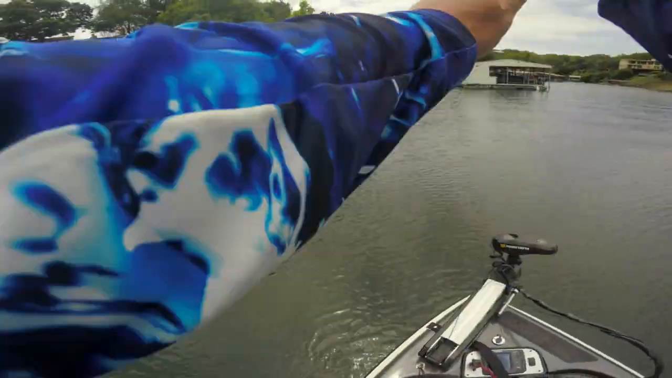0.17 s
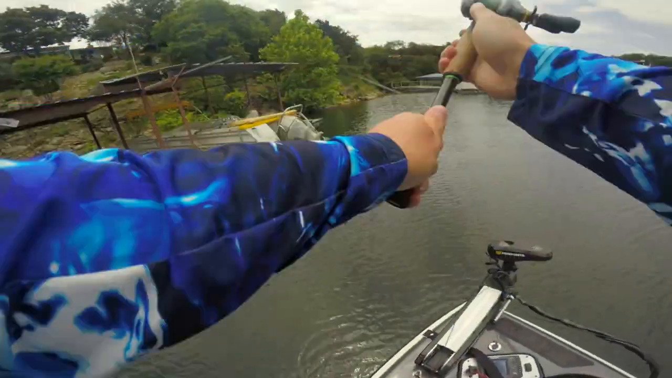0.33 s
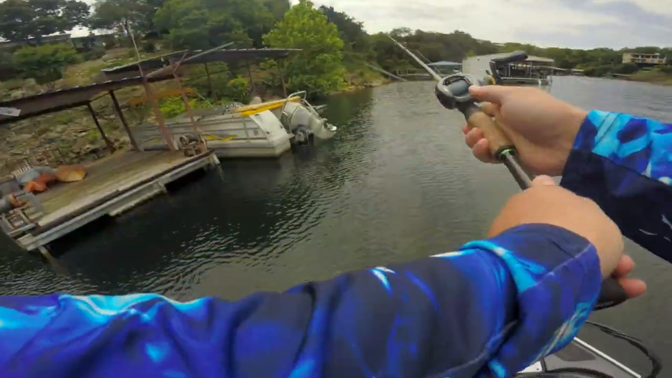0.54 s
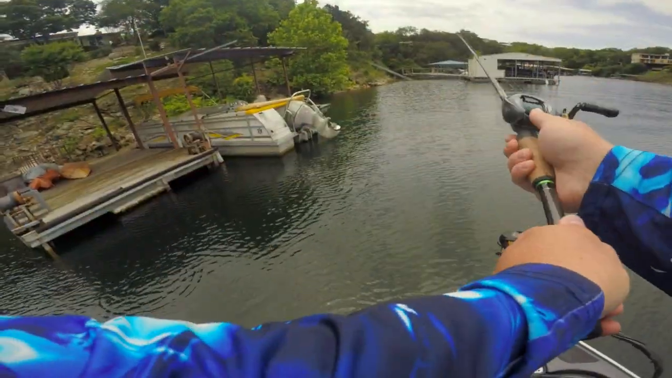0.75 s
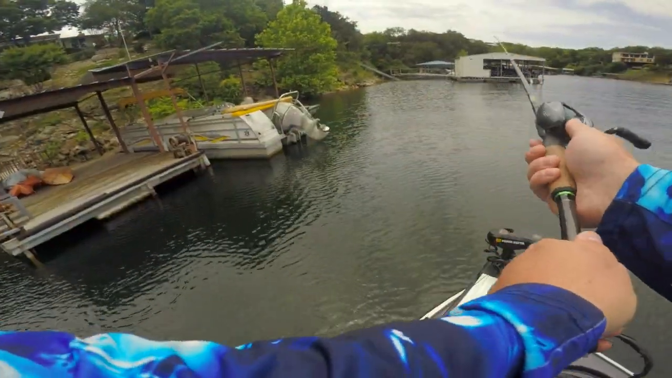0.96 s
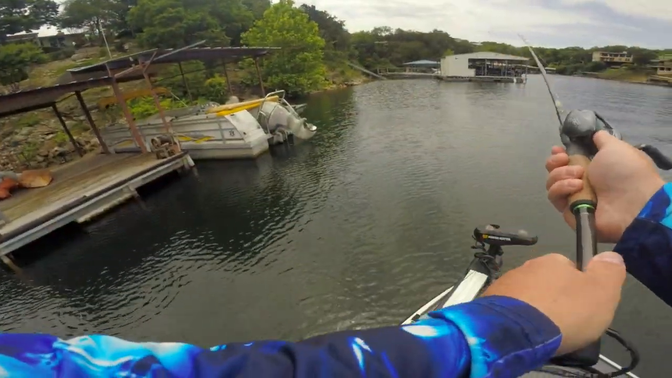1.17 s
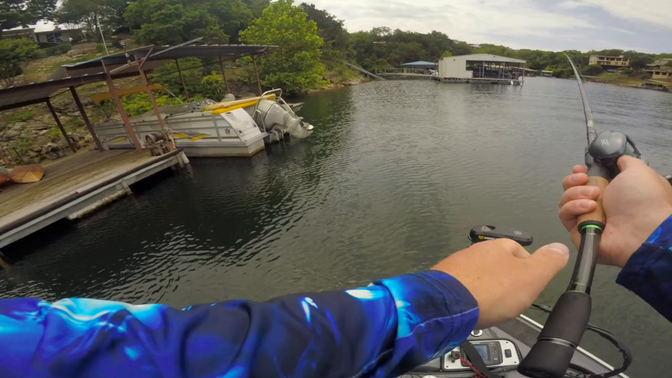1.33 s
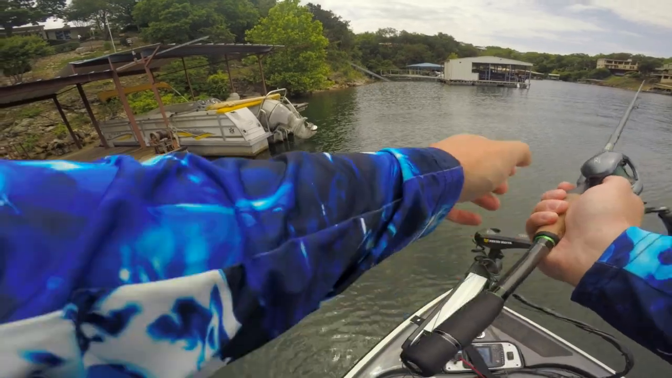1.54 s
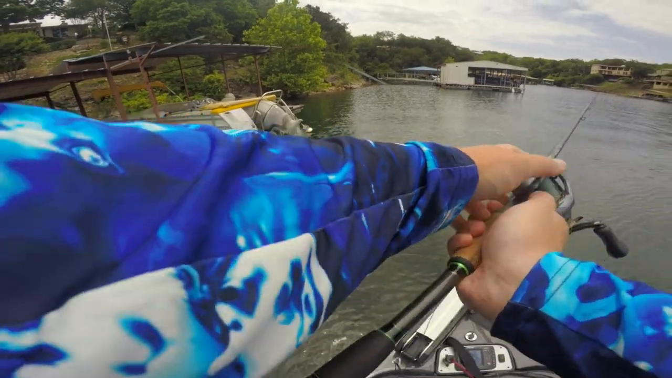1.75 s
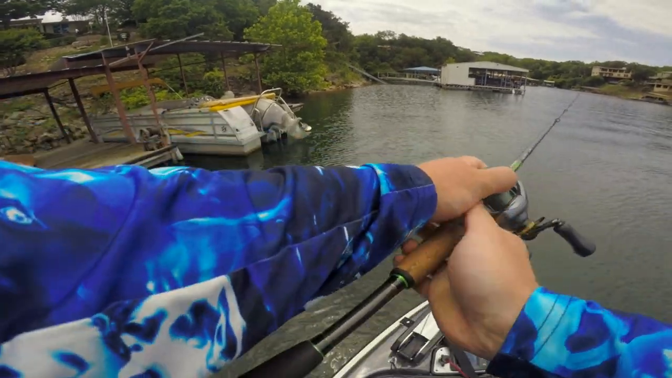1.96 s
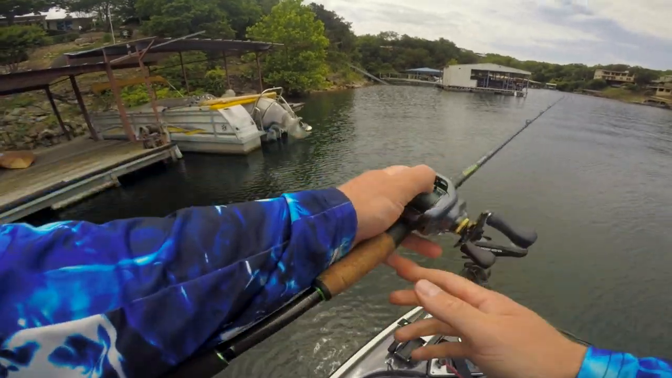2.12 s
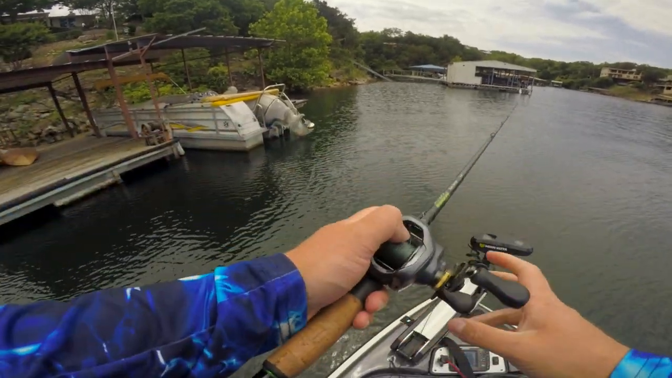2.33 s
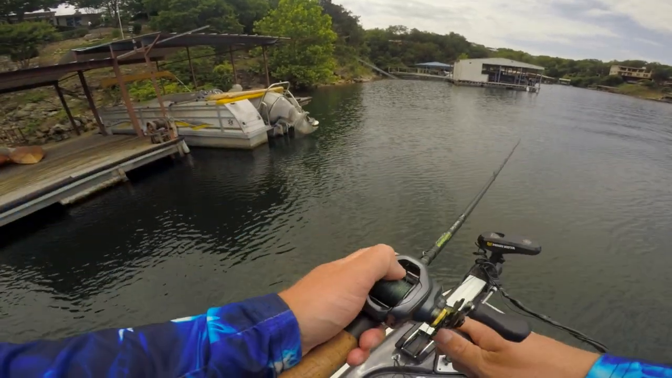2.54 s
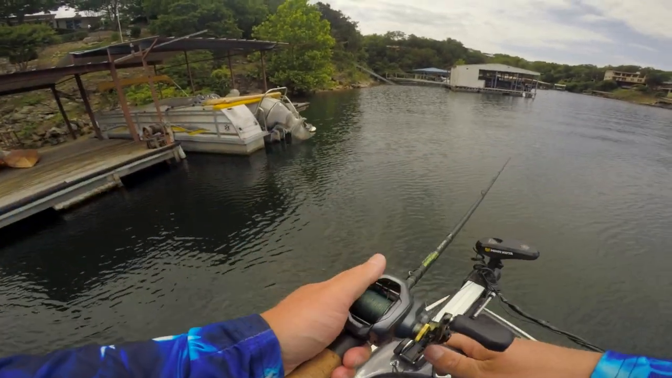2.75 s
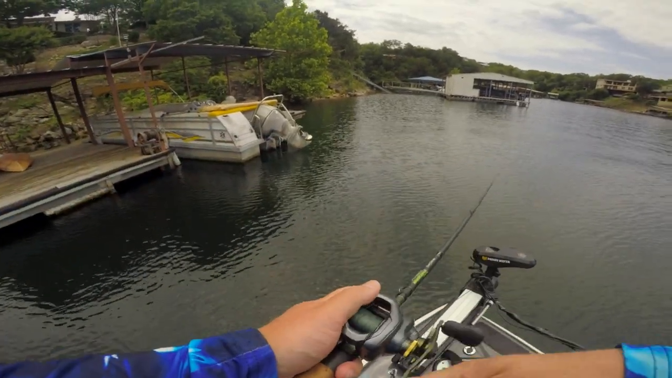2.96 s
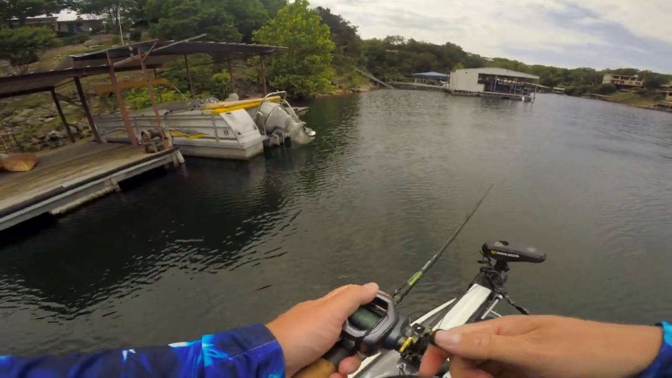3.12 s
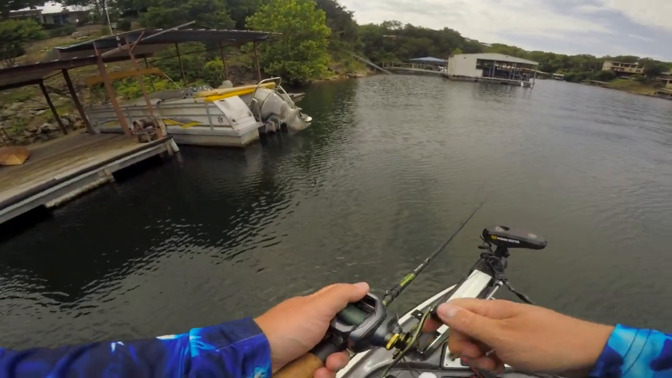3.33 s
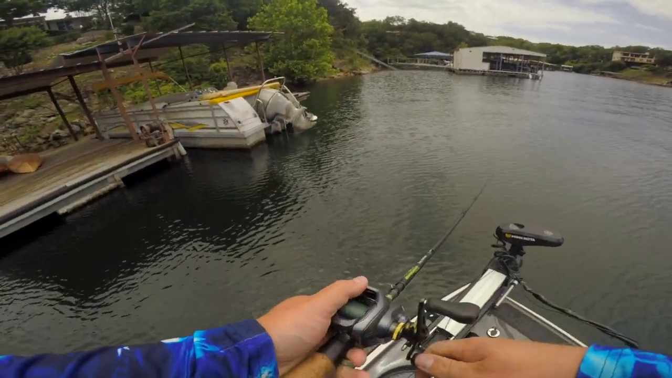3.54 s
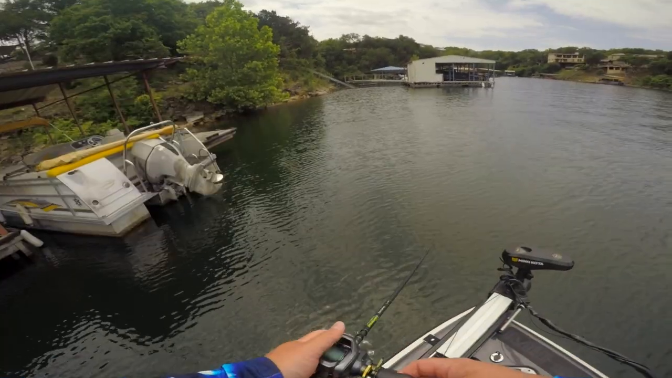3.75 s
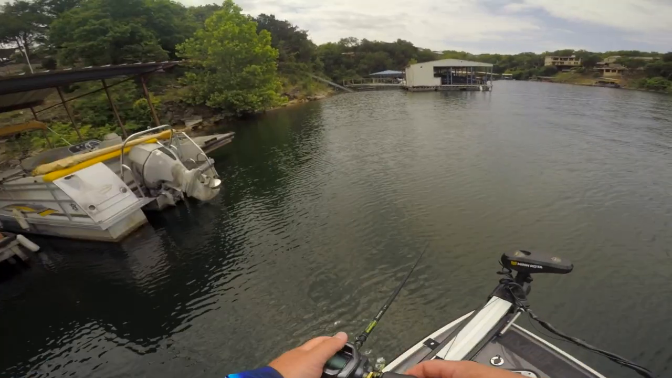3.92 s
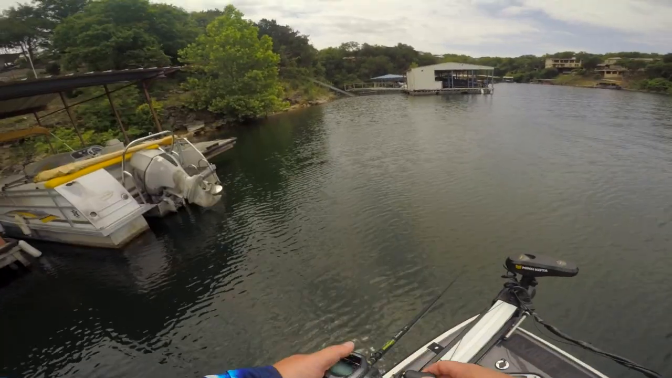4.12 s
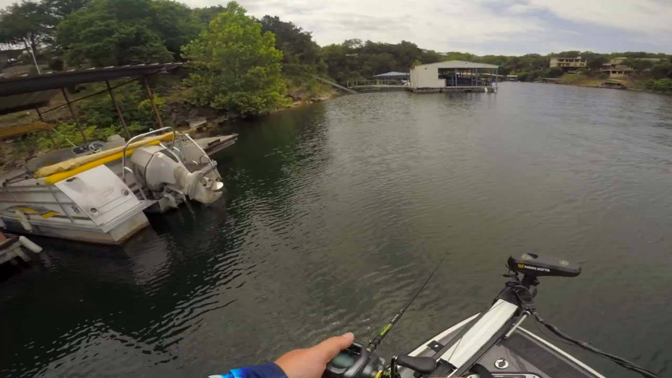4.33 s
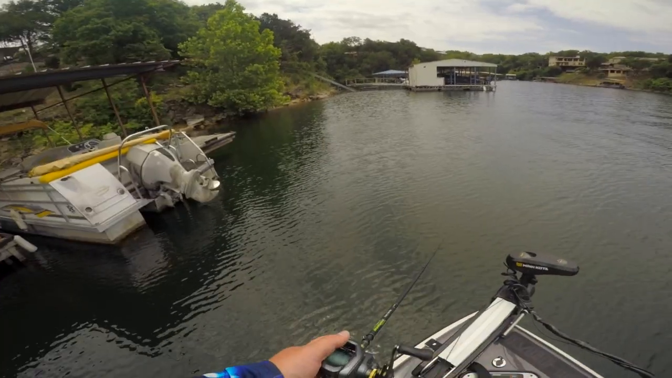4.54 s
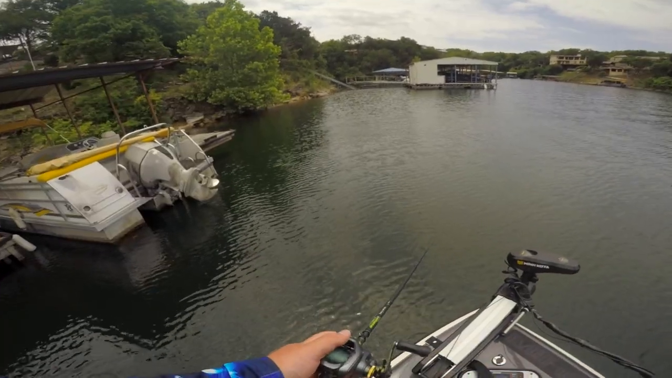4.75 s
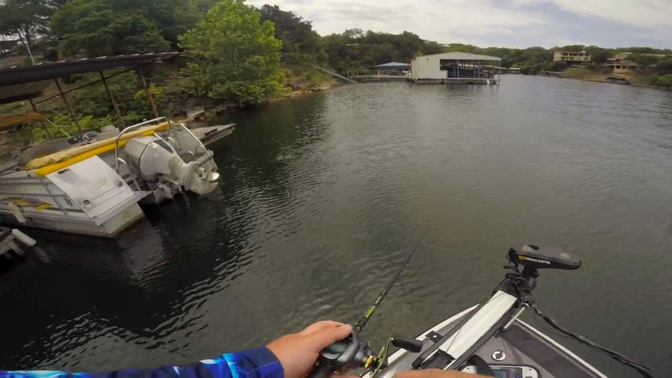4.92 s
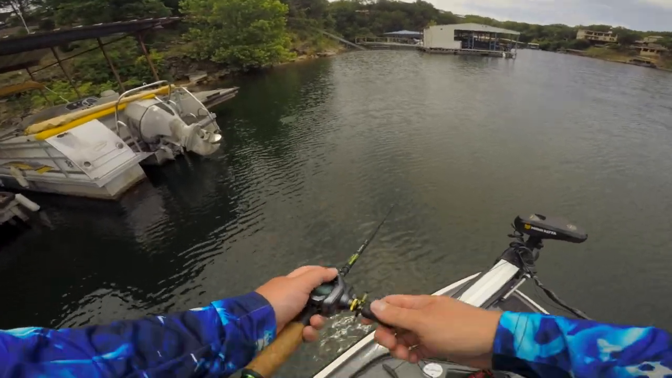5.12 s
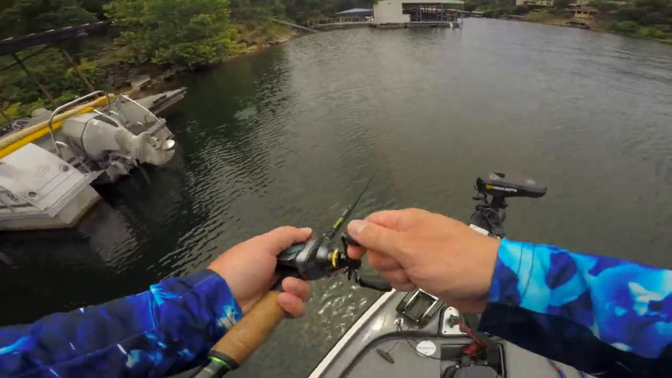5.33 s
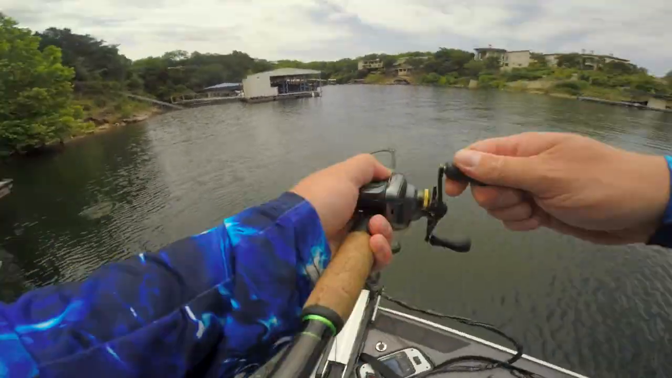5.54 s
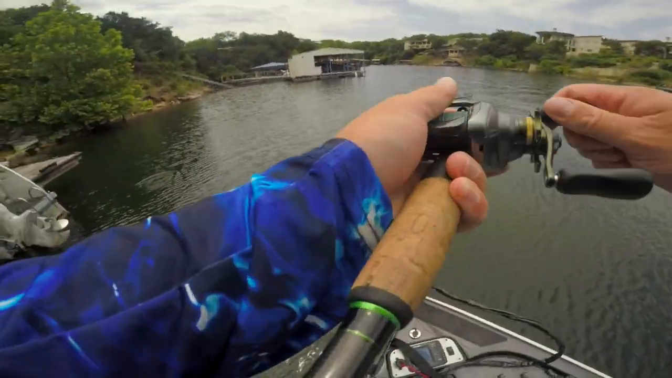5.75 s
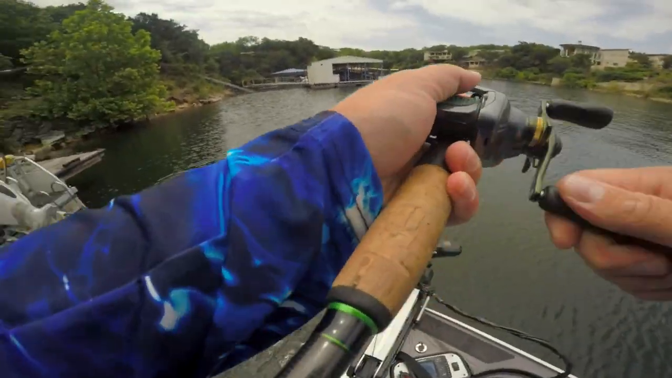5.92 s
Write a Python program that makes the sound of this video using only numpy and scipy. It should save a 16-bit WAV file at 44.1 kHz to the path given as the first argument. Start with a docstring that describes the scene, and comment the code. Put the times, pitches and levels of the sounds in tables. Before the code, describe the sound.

From a boat on a calm lake, a microphone worn on the body picks up rustling sleeves and low bumps, then a cast reel's thin electric whine sinking and fading. The clutch shuts with one very loud, sharp metal snap, followed by faint ticks, a handle squeak and small chink. Shore birds chirp softly, and heavy cloth rubbing and thumps return at the end.

```python
"""On a calm lake a body-worn two-port microphone hears far wind, water and engines, mount rumble and sleeve rub.
From 0.4 s a cast from the boat makes the reel's chopped brake coil whine; the spool speeds up, then slows.
Birds sing on the shore from 1.5 s; the clutch snaps shut at 2.85 s and the reel ticks on.
From 3.8 s the handle squeaks and chinks, wavelets plop, and at 5.8 s a finger slides on the grip.
Filtered noise makes cloth, mount and lake; decaying sines make reel contacts; gliding tones make the songs."""
import sys
import numpy as np
from scipy import signal
from scipy.io import wavfile

SR = 44100
rng = np.random.default_rng(int(sys.argv[2]) if len(sys.argv) > 2 else 0)


def wav_record(signal):
    """Record a signal, one row per channel, as 16-bit PCM in the file named by sys.argv[1]."""
    frames = np.transpose(np.atleast_2d(signal))
    bounded = np.clip(frames, -1, 1)
    # unit amplitude maps onto the largest positive 16-bit level
    quanta = np.round(bounded * 32767).astype(np.int16)
    wavfile.write(sys.argv[1], SR, quanta)


N = 268039
TIME = np.arange(N) / SR


def from_db(db):
    """Decibels to gain."""
    return 10 ** (np.asarray(db) / 20)


def rms_one(x):
    """Scale to unit rms."""
    return x / np.sqrt(np.mean(x ** 2) + 1e-20)


def in_time(rows):
    """Table columns after the first, interpolated over time."""
    s, *columns = np.transpose(rows)
    return [np.interp(TIME, s, column) for column in columns]


def at_hz(points, hz):
    """Read a spectrum on a log frequency axis."""
    f, value = np.transpose(points)
    return np.interp(np.log(hz), np.log(np.maximum(f, 1)), value)


def pan(db):
    """Left and right gains, db being left minus right."""
    return from_db(np.array([db / 2, -db / 2]))


def band(x, low_hz, high_hz):
    """Band-pass."""
    edges = [low_hz, min(high_hz, .45 * SR)]
    return signal.sosfilt(signal.butter(2, edges, "band", fs=SR, output="sos"), x)


def drift(rate_hz, size=N):
    """Slow random wander of unit rms, low-passed near rate_hz."""
    step, lead_in = 40, 2000  # samples per coarse point; coarse points dropped while the filter settles
    r = np.exp(-2 * np.pi * rate_hz * step / SR)
    coarse = rng.standard_normal(N // step + lead_in + 2)
    slow = signal.lfilter([1], [1, -2 * r, r * r], coarse)[lead_in:]
    return np.interp(np.arange(size) / step, np.arange(len(slow)), rms_one(slow))


def add(out, s, piece):
    """Mix a stereo piece in at time s."""
    i = max(round(s * SR), 0)
    out[:, i:i + piece.shape[1]] += piece[:, :max(N - i, 0)]


def alike_mix(mid, side, alike):
    """Two unrelated signals mixed to a left-right correlation."""
    alike = np.clip(alike, -1, 1)
    return np.sqrt(1 + alike) * mid + np.sqrt(1 - alike) * side * [[1], [-1]]


def paired(x, alike):
    """Correlated stereo mix at unit rms."""
    return rms_one(alike_mix(x[0], x[1], alike))


def whistle(note, start, level_db, waver_db):
    """One near-sine whose phase sums a gliding frequency, wavering in level."""
    s, hz, db = np.transpose(note)
    t = np.arange(s[0], s[-1], 1 / SR)
    edge = np.clip(np.minimum(t - s[0], s[-1] - t) / 0.00063, 0, 1)
    gain = edge * from_db(np.interp(t, s, db) + level_db + waver_db * drift(30, size=len(t)))
    phase = 2 * np.pi * np.cumsum(np.interp(t, s, hz)) / SR
    tone = np.sqrt(2) * gain * np.sin(phase)
    return np.roll(np.pad(tone, (0, N - len(t))), round((start + s[0]) * SR))


# Spectrum of the open lake. Each row: frequency in Hz, relative density in dB per Hz.
LAKE_SPECTRUM = [(12, -30), (20, 7.5), (126, -6), (233, -16), (454, -20.5), (601, -25), (1020, -29),
                 (2170, -31.5), (2560, -35.5), (3580, -38.5), (5140, -38.5), (14400, -46.5), (15700, -42)]
# Likeness of the two ports out on the lake. Each row: frequency in Hz, left-right correlation.
LAKE_LIKENESS = [(60, 1), (150, 1), (380, 1), (950, 0.65), (2380, 0.57), (5980, 0.74), (15000, 0.041)]
LAKE_DB = -46  # rms


def lake():
    """Far wind, water and engines blend into noise, built in half-octave bands that each waver."""
    edges_hz = 18 * 2 ** np.arange(0, 10.1, .5)
    white = rng.standard_normal((2, 2, N))
    out = 0
    for k, (low, high) in enumerate(zip(edges_hz, edges_hz[1:])):
        mid, side = band(white[k % 2], low, high)
        centre = np.sqrt(low * high)
        gain = from_db(at_hz(LAKE_SPECTRUM, centre) + 1.4 * drift(2.9))
        out = out + gain * alike_mix(mid, side, at_hz(LAKE_LIKENESS, centre))
    return from_db(LAKE_DB) * rms_one(out)


# The mount shaken by body and breeze, at the ports.
# Each row: time in seconds, rumble in dB, knocking in dB.
SHAKE = [(0, -46, -82), (.1, -42, -53), (.3, -31, -50.5), (.5, -39, -58), (.75, -58, -79), (1.3, -50, -64),
         (1.8, -61, -77), (2.2, -57, -59), (2.45, -58, -75), (2.7, -50, -70), (3.0, -55, -72),
         (3.15, -57, -57.5), (3.4, -60.5, -73), (3.6, -56, -60.5), (3.9, -63.5, -72.5), (5.0, -59.5, -72),
         (5.2, -53, -55.5), (5.33, -32.5, -51), (5.49, -37.5, -45), (5.61, -24, -35), (5.73, -46.5, -73),
         (5.87, -42, -62), (6.03, -36.5, -56)]
LUMPS_DB = 0.5  # slow unevenness of the shaking


def mount():
    """Body and breeze shake the ports almost independently: low rumble and higher knocking, in lumps."""
    rumble_db, knock_db = in_time(SHAKE)
    shake, lumps_db = rng.standard_normal((2, 2, N)), LUMPS_DB * drift(11)
    rumble = paired(band(shake[0], 9.6, 54.0), .1) * pan(1.2)[:, None]
    knocks = paired(band(shake[1], 64, 297) * from_db(2.0 * drift(30)), -0.27)
    return from_db(rumble_db + lumps_db) * rumble + from_db(knock_db + lumps_db) * knocks


# Resonances of the port cavity, for rub and snags alike. Each row: centre in Hz, width in Hz, level in dB.
CAVITY = [(2497, 570, 19.5), (3700, 610, 21), (5550, 580, 1.5)]
# Steady rustle of sleeves near the ports. Each row: time in seconds, treble in dB, dull part in dB.
RUSTLE = [(0, -59, -59.5), (.12, -57.5, -57), (.31, -51, -53.5), (.45, -42, -42), (.62, -52.5, -57.5),
          (.74, -58, -54.5), (1.1, -61.5, -65), (1.45, -59, -59.5), (1.85, -65, -67), (2.08, -66, -57),
          (2.36, -67, -86), (2.84, -67, -61), (2.98, -61.5, -61), (3.14, -63, -57), (3.4, -65.5, -64),
          (3.74, -61, -62.5), (4.08, -65, -60), (4.25, -75.5, -74), (4.9, -69.5, -65.5), (5.2, -57, -65),
          (5.5, -45.5, -48.5), (5.68, -54, -58.5), (5.95, -60.5, -59), (6.078, -57, -56.5)]
# Strokes of cloth past the ports. Each row: peak time in seconds, level in dB, swell and fade widths
# in seconds, brightness in dB against the cavity part, pan in dB (left minus right).
STROKES = [(.155, -55.5, 0.045, 0.027, -2, 4), (0.254, -38, 0.024, 0.017, -4, 3),
           (.368, -41, 0.01, 0.013, 0, 1), (.397, -39.5, 0.0094, 0.0077, -3, 3),
           (0.429, -38.5, 0.007, 0.012, 6.5, -4), (.52, -76, 0.024, 0.012, -9, 1),
           (.592, -48.5, 0.02, 0.031, -4, -1), (.99, -52, 0.03, 0.01, -10, 5),
           (1.085, -53.5, 0.023, 0.04, -7, 1), (1.25, -52.5, 0.027, 0.033, -3.5, 5),
           (1.35, -53.5, 0.029, 0.018, -9, 3), (1.965, -62.5, 0.011, 0.17, 7.5, 5),
           (2.217, -51, 0.028, 0.067, -7, 1), (2.887, -55.5, .006, .02, 6.5, -4),
           (3.819, -54, 0.021, 0.058, 2.5, -2.5), (4.06, -62.5, 0.017, 0.05, -2.5, -1),
           (4.97, -62.5, .012, .02, -2, -2), (5.242, -46.5, 0.058, 0.026, -10, 5),
           (5.343, -35, 0.012, 0.018, -6, 4.5), (5.437, -37, 0.016, .018, -9.5, 0),
           (5.567, -39.5, 0.024, 0.01, -9, 4), (5.62, -42, 0.017, 0.021, -15, 6),
           (6.03, -51.5, 0.052, 0.072, -2.5, 1.5)]
RUSTLE_CAVITY_DB = -8  # cavity part of the rustle, against its treble
STROKE_DULL_DB, CLOTH_AIR_DB = -13.5, -16  # dull part against the cavity part; top hiss against the bright part


def sleeves():
    """Cloth drags in dense uneven grains through the port cavity; each stroke swells and fades as a bell curve."""
    grains = rng.standard_normal((2, N)) * from_db(2.3 * drift(220) + 1.72 * drift(21))
    cavity = 0
    for k, (hz, width, db) in enumerate(CAVITY):
        r = np.exp(-np.pi * width / SR)
        poles = [1, -2 * r * np.cos(2 * np.pi * hz / SR), r * r]
        tuned = signal.lfilter([1 - r * r, 0, r * r - 1], poles, grains)
        cavity = cavity + (-1) ** k * from_db(db) * tuned
    cavity = paired(cavity, 0.017)
    bright = paired(band(grains, 4300, 9540), -0.24)
    bright = bright + from_db(CLOTH_AIR_DB) * paired(band(grains, 8600, 12500), 0.091)
    dull = paired(band(grains, 240, 2260), 0.64)

    treble_db, dull_db = in_time(RUSTLE)
    out = from_db(treble_db) * (bright + from_db(RUSTLE_CAVITY_DB) * cavity) + from_db(dull_db) * dull
    for s, db, swell, fade, bright_db, pan_db in STROKES:
        near = slice(max(round((s - 4 * swell) * SR), 0), round((s + 4 * fade) * SR))
        t = TIME[near] - s
        bell = np.exp(-.5 * (t / np.where(t < 0, swell, fade)) ** 2)
        cloth = cavity[:, near] + from_db(bright_db) * bright[:, near]
        cloth = cloth + from_db(STROKE_DULL_DB) * dull[:, near]
        out[:, near] += from_db(db) * bell * cloth * pan(pan_db)[:, None]
    return out


# Paths round the microphone housing. Each row: frequency in Hz, radians by which the left port leads.
PORT_LEAD = [(600, -.3), (1600, .2), (3000, -.2), (4200, -1.2), (5200, .2), (6500, .6), (8000, 1.8),
             (10500, 3.5), (13000, 4.7)]
# Shading by the housing. Each row: frequency in Hz, left minus right in dB.
PORT_TILT = [(900, -2), (2300, -2), (3000, -3), (4200, -3.5), (6500, -3), (10500, 4.5)]


def ring(hz, db, t60, phase, size):
    """Decaying sines summed in each port, shifted and shaded by the paths round the housing."""
    t = np.arange(size) / SR
    lead = at_hz(PORT_LEAD, hz) * np.array([[.5], [-.5]])
    waves = np.sin(2 * np.pi * hz[:, None] * t + (phase + lead)[:, :, None])
    waves *= pan(at_hz(PORT_TILT, hz))[:, :, None]
    return (waves * from_db(db[:, None] - 60 * t / t60[:, None])).sum(axis=1)


# Snags of cloth close to the ports. Each row: start in seconds, peak of the ringing in dB before pan,
# centre in Hz, pan in dB (left minus right).
SNAGS = [(0.3107, -40, 7300, 18), (0.366, -20.5, 2420, 19), (1.224, -29, 3630, -2), (2.052, -33, 3700, 9),
         (2.0676, -31, 3740, 19), (3.3967, -38.5, 3820, 2), (3.8903, -32, 2560, -14),
         (3.9558, -32, 3700, 9), (4.9726, -34, 2830, 6), (5.137, -34, 3770, 17), (5.3304, -32, 2550, -24),
         (5.406, -28, 7500, -2), (5.424, -24.5, 3930, 11), (5.568, -22, 3690, 14),
         (5.5768, -10.5, 2530, -21), (5.619, -12.5, 3330, -9.5), (5.892, -31, 2900, 2.0)]


def snags():
    """A snag is one click that rings the port cavity, strongest near its own centre, with a noisy onset."""
    out, (hz, width, db) = np.zeros((2, N)), np.transpose(CAVITY)
    for s, peak_db, centre_hz, pan_db in SNAGS:
        level = np.append(db - 9 * np.abs(np.log2(hz / centre_hz)), 0)
        t60 = np.append(4.07 / width, .006)
        hit = ring(np.append(hz, centre_hz), level, t60, 0, size=800)
        hit *= np.minimum(np.arange(800) / 25, 1) / np.abs(hit).max()
        onset = rng.standard_normal((2, 200)) * from_db(-np.arange(200) * 2.5)
        hit[:, :200] += from_db(-11.5) * onset
        add(out, s, from_db(peak_db) * hit * pan(pan_db)[:, None])
    return out


# The spool after release, heard from the body of the caster.
# Each row: time in seconds, magnet poles passing per second in Hz, whine gain in dB.
SPOOL = [(.415, 919, -60), (.435, 951, -57), (.48, 970, -61), (.58, 830, -58), (.7, 700, -58.5),
         (.9, 517.6, -61.5), (1.02, 416, -63), (1.26, 284, -67), (1.425, 216, -70.5), (1.47, 188, -91)]
# Coil force. Each row: multiple of the chop rate, then level in dB at 0.894 s and fading in dB per second
# for the centre line, for the line lower by the pole rate and for the line higher by it.
COIL = [(0, -60, 0, -60, 0, -5, 25), (1, 1, 7, -16, -10, -7, 37), (2, -0.5, 11, -9.5, -19, 1.5, 7),
        (3, -9, 7, -16, 5, -5.5, 10), (4, 2.5, 4, -31, -6, -9, -12), (5, -9.5, 0, -34.5, 91, -11.5, 17),
        (6, -10, -8, -24, 2, -7.5, -9), (7, -21, 8, -19, 2, -28, 2), (8, -30, 12, -29, 0, -31, 12),
        (9, -26, 0, -31, 0, -14, 5), (10, 0.5, -9, -19, -12, 4, 2), (11, 4, -8, -4, -18, -3, -15),
        (12, -1, -6, -19, -10, -24, 0), (13, -10, -13, -25, -6, -19, -14), (14, -4, -10, -14, -6, -24, -8),
        (15, -7, -13, -19, -4, -22, -8)]
# The coil's path while the rod points away. Each row: frequency in Hz, radians by which the left port leads.
COIL_LEAD = [(1000, .4), (2000, .8), (4000, .7), (6000, 2.4), (10000, 3.4), (12000, 3.2), (14000, 4.3)]
CHOP_HZ, POLES = 974.45, 4  # chop rate of the current; magnet poles per turn
TURN_DB, TURN_FADE_DB = 4, 54  # unbalance hum against the whine gain at 0.5 s; its fading in dB per s
WOBBLE = 0.82  # depth of the once-a-turn throb at the tenth chop multiple
BEARING_DB = -5  # bearing hiss against the whine gain, at 1.4 s


def brake():
    """The chopped current times the passing poles gives lines at chop multiples, plus and minus the pole rate."""
    poles_hz, whine_db = in_time(SPOOL)
    on = (TIME > SPOOL[0][0]) & (TIME < SPOOL[-1][0])
    t = TIME[on]
    poles = 2 * np.pi * np.cumsum(poles_hz[on]) / SR
    turn = poles / POLES
    out = np.zeros((2, N))
    for k, *lines in COIL:
        chop = 2 * np.pi * k * CHOP_HZ * t
        lead = at_hz(COIL_LEAD, max(k, .5) * CHOP_HZ) * np.array([[.5], [-.5]])
        for db, fade_db, side in zip(lines[::2], lines[1::2], (0, -1, 1)):
            # the rod moves, the poles are uneven
            flutter = 0.31 * drift(11.0, size=len(t)) + 2.7 * abs(side) * drift(40, size=len(t))
            throb = 1 + WOBBLE * k / 10 * np.sin(turn + rng.uniform(0, 2 * np.pi))
            wave = np.sin(chop + side * poles + rng.uniform(0, 2 * np.pi) + lead)
            out[:, on] += from_db(db - fade_db * (t - 0.894) + flutter) * throb * wave
    out[:, on] += from_db(TURN_DB - TURN_FADE_DB * (t - .5)) * np.sin(turn)

    # uneven bearing hiss, present throughout and rising against the whine gain
    noise = rng.standard_normal((2, N))
    hiss = rms_one(band(noise, 9500, 11800)) + from_db(-0.5) * rms_one(band(noise, 11800, 15000))
    out += from_db(BEARING_DB + 4.2 * (TIME - 1.4) + 2.7 * drift(9)) * hiss
    return np.sqrt(2) * from_db(whine_db) * out * pan(7.3)[:, None]


# Reel parts meeting in the hands, the clutch at 2.85 s. Each row: start in seconds, peak of the ringing in dB
# before pan, strongest Hz, treble in dB, pan in dB (left minus right), thump in dB against the ringing.
REEL_HITS = [(0.424, -26, 2050, -10, -1, -16), (0.428, -16, 2050, -2.5, 3.5, -16),
             (0.629, -26, 783, -4.5, 2, -10.5), (0.946, -33, 810, -15, 1, -7.5),
             (1.477, -35.5, 2940, -9, -2, -9), (1.79, -33, 4700, -22, 3, -14),
             (1.904, -38, 990, -7, 1, -24), (1.954, -31, 4600, -18, -1, -25),
             (2.8202, -28, 3700, -27, 4, -41), (2.833, -23, 4500, -15, 7, -23),
             (2.8421, -10.5, 6600, -16, -11, -20), (2.8472, -16, 2500, -16.5, 18, -31),
             (2.85, 12.5, 4280, -15, 1.5, -36), (2.8513, 3, 1260, -17, 0.5, -23),
             (2.8583, -23, 2300, -10, 7, -30), (2.955, -30, 700, -9.5, 2.5, -10),
             (3.009, -35, 2100, -34, 3, -19), (3.036, -34.5, 1240, -28, 0, -15),
             (3.107, -24.5, 1570, -41, 3.5, -1.5), (3.164, -34, 1030, -42, 7, -19),
             (3.521, -26, 1340, -12.5, 6, -9), (3.542, -38.5, 1100, -29, 0, -1.5),
             (3.558, -27, 1330, -10, 5.5, -5.5), (3.622, -34, 680, -10, 3.5, -4),
             (3.632, -42, 1300, -24, 10, -3), (3.697, -27, 1640, -8.5, 8, -16),
             (3.721, -27.5, 1030, -11, 4, -5), (3.732, -34, 1500, -10, -4, -20),
             (4.166, -34.5, 2680, -28, 5, -12), (4.278, -38, 2055, -30.5, 6, -27),
             (4.992, -35, 1840, -33, 3.5, -33), (5.736, -28.5, 9130, 0.5, 2.5, -17),
             (5.828, -24, 5630, -9.5, 1, -19), (6.068, -25, 517, -9.5, -2, -7.5)]
# Modes of the reel frame. Each row: frequency in Hz, level in dB, free t60 in seconds (the hand shortens it).
REEL_MODES = [(520, -12, 0.051), (900, -7.5, 0.11), (1580, -15, 0.09), (1893, -3, 0.026),
              (2346, -11.5, 0.14), (2750, -6.5, 0.016), (3531, -3, 0.013), (4210, 15, 0.0077),
              (4700, 5.5, 0.021), (5390, -1, 0.055), (6800, 7.5, 0.027), (8500, -13, 0.047),
              (9100, -23, 0.034), (10610, -7, 0.019), (11550, -16.5, 0.028), (13080, -13, 0.024),
              (13930, -21.5, 0.037), (15800, -14, 0.02)]
THUMP_LAG_S = .016  # the thump travels down the rod
SOFT_SHARE = 0.58  # share of the treble level change shown from an octave over the strongest Hz to 8.5 kHz


def reel():
    """Each contact sets the frame's modes ringing, with a bright crack, a dull rattle and a thump down the rod."""
    out, (hz, db, t60), t = np.zeros((2, N)), np.transpose(REEL_MODES), np.arange(4000) / SR
    for s, peak_db, centre_hz, treble_db, pan_db, thump_db in REEL_HITS:
        treble_share = np.where(hz > 8500, 1, SOFT_SHARE * (hz > 2 * centre_hz))
        emphasis_db = 12 * np.exp(-1.5 * np.log2(hz / centre_hz) ** 2)
        spread_db = 1.5 * rng.standard_normal(len(hz))
        level = db + emphasis_db + spread_db + treble_db * treble_share
        phase = 2.9 * rng.standard_normal(len(hz))
        # the gripping hand damps most of the ring at once and a little lingers
        hit = ring(hz, level, 0.16 * t60, phase, size=4000)
        hit += ring(hz, level - 19.5, .6 * t60, phase, size=4000)
        hit /= np.abs(hit).max()

        noise = rng.standard_normal((2, 4000))
        crack = rms_one(band(noise, 7600, 15000)) * from_db(treble_db - 60 * t / 0.0085)
        rattle = paired(band(noise, 1500, 2800), 0.88) * from_db(-20.5 - 60 * t / 0.026)
        rattle += paired(band(noise, 260, 870), 0.99) * from_db(thump_db - 11.0 - 60 * t / 0.13)
        rattle += paired(band(noise, 800, 1900), 1.0) * from_db(thump_db - 10 - 60 * t / 0.085)
        hit = (hit + crack + rattle) * np.minimum(t / 0.0003, 1) * pan(pan_db)[:, None]
        thump = np.sin(2 * np.pi * 85 * t) * np.minimum(t / 0.014, 1) * from_db(thump_db - 60 * t / 0.091)
        add(out, s, from_db(peak_db) * hit)
        add(out, s + THUMP_LAG_S, from_db(peak_db) * np.array([thump, thump]))
    return out


# Two figures of the near singer, each a list of notes.
# Each row of a note: seconds after the start, frequency in Hz, level in dB against the figure.
DROP = [
    [(0, 2620, -12), (.008, 2632, -0.5), (.028, 2693, 0), (.034, 2720, -6)],
    [(.044, 3880, -12.5), (.052, 3000, -6), (.060, 2720, 0), (.070, 2330, -0.5)],
]
RISE = [
    [(0, 2360, -14), (.008, 2790, -1), (.017, 2800, -13)],
    [(.016, 3190, -16), (.022, 3353, 0), (.036, 3370, 1.5), (.048, 3710, -2), (.056, 4320, -7),
     (.066, 4600, -18)],
    [(.010, 4830, -17), (.020, 4360, -17), (.045, 4320, -15)],
]
# When the near singer sings each figure. Each row: start in seconds, level in dB.
DROPS = [(1.451, -58), (1.791, -60), (4.170, -55), (4.512, -48.5), (4.841, -51), (5.172, -53)]
RISES = [(1.635, -53.5), (4.37, -48.5), (4.700, -46.5), (5.044, -47)]
# Far whistles, a list of notes. Each row of a note: time in seconds, frequency in Hz, level in dB.
WHISTLES = [
    [(1.69, 3900, -66), (1.72, 3560, -68), (1.78, 3310, -69), (1.98, 3300, -85)],
    [(2.55, 7300, -68), (2.57, 6800, -66), (2.60, 6500, -78)],
    [(2.56, 4680, -79), (2.66, 4440, -69), (2.72, 4180, -62.5), (2.77, 4220, -74), (2.81, 4030, -71),
     (2.95, 4030, -67.5), (3.3, 3680, -76), (3.6, 3420, -71)],
    [(4.48, 5450, -79), (4.6, 5380, -75), (4.8, 5340, -77.5), (4.95, 5400, -72.5)],
    [(4.40, 2400, -73), (4.43, 2120, -68.5), (4.5, 2200, -79.5), (4.65, 2150, -69.5), (4.8, 2260, -87.5),
     (4.9, 2200, -66)],
]
# Echoes off docks and trees. Each row: delay in seconds, level in dB.
SHORE = [(.021, -20), (.047, -22), (.083, -24), (.131, -25)]


def birds():
    """A near singer on the left repeats two figures, others whistle far off on the right; the shore echoes them."""
    near = sum(whistle(note, s, db, 0.53) for figure, rows in ((DROP, DROPS), (RISE, RISES))
               for s, db in rows for note in figure)
    far = sum(whistle(note, 0, 0, 2.5) for note in WHISTLES) * from_db(4.5 * drift(160))
    # the port farther from the bird hears it a few samples late
    out = np.array([near, np.roll(near, 4)]) * pan(2.8)[:, None]
    out += np.array([np.roll(far, 3), far]) * pan(-0.5)[:, None]
    for k, (s, db) in enumerate(SHORE):
        # each echo reaches one port, and the other after 2.3 times the delay
        out[k % 2] += from_db(db) * np.roll(near + far, round(s * SR))
        out[1 - k % 2] += from_db(db) * np.roll(near + far, round(2.3 * s * SR))
    return out


# The handle squeaks on its shaft, a list of squeaks.
# Each row of a squeak: time in seconds, frequency in Hz, level in dB.
SQUEAKS = [
    [(3.79, 2760, -58), (3.82, 2770, -51), (3.95, 2770, -57.5), (4.03, 2740, -61), (4.07, 2670, -60)],
    [(4.94, 2710, -64.5), (4.97, 2770, -60), (5.16, 2770, -76)],
]


def handle_squeaks():
    """The handle turning on its shaft gives a wavering tone, later at the left port by 5 samples."""
    squeak = sum(whistle(note, 0, 0, 1.5) for note in SQUEAKS) * from_db(2.0 * drift(150))
    return np.array([np.roll(squeak, 5), squeak])


# Modes of the handle knob. Each row: frequency in Hz, relative level in dB, t60 in seconds.
KNOB = [(5938, -2, 0.24), (6900, -8, 0.23), (7332, -10, 0.59), (9270, 18, 0.18), (10500, 12, 0.11),
        (11100, -2, 0.13), (11600, -20, 0.34), (12170, -23, 0.44), (14200, -19.5, 0.42), (14500, -11, 0.26)]
CHINK_S, CHINK_DB = 3.805, -51  # start; level added to every mode


def knob_chink():
    """The loose handle knob chinks: high modes ring up in 9 ms, flicker and decay."""
    out, (hz, db, t60) = np.zeros((2, N)), np.transpose(KNOB)
    rise = np.minimum(np.arange(16000) / SR / 0.0092, 1)
    flicker = from_db(4.3 * drift(250, size=16000))
    add(out, CHINK_S, rise * flicker * ring(hz, db + CHINK_DB, t60, 0, size=16000))
    return out


# A wavelet on the hull. Each row: seconds after the start, frequency in Hz, level in dB against the plop.
PLOP = [(0, 960, -11), (.008, 1000, 0.5), (.027, 1110, -6)]
# When wavelets plop against the boat. Each row: start in seconds, level in dB.
PLOPS = [(4.598, -57.5), (5.076, -58.5)]


def wavelets():
    """A wavelet plops on the hull as a short tone gliding upward, alike at both ports."""
    return sum(whistle(PLOP, s, db, 0.92) for s, db in PLOPS)


# A finger slides on the grip. Each row: time in seconds, level in dB.
SCUFF = [(5.785, -90), (5.797, -53), (5.828, -56), (5.84, -92)]


def finger_scuff():
    """Skin sliding on the grip makes a short narrow band of noise."""
    return from_db(in_time(SCUFF)[0]) * paired(band(rng.standard_normal((2, N)), 1700, 2150), .7)


def scene():
    """All sources at the two ports."""
    out = lake() + mount() + sleeves() + snags() + brake() + reel() + birds()
    return out + handle_squeaks() + knob_chink() + wavelets() + finger_scuff()


OVERLOAD, CUTOFF_HZ = .82, 16200  # input limit in full scale; stop-band edge


def record(dry):
    """The snap overloads the input, which clips; a steep low-pass cuts the top."""
    clipped = np.clip(dry, -OVERLOAD, OVERLOAD)
    return signal.sosfilt(signal.cheby2(12, 70, CUTOFF_HZ, fs=SR, output="sos"), clipped)


dry = scene()
out = record(dry)
wav_record(out)
```